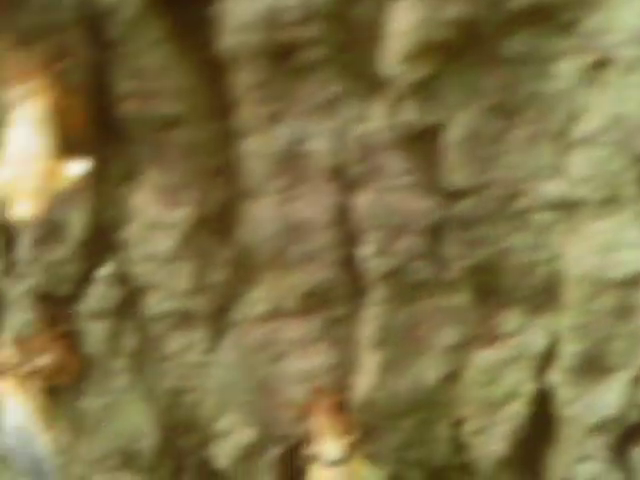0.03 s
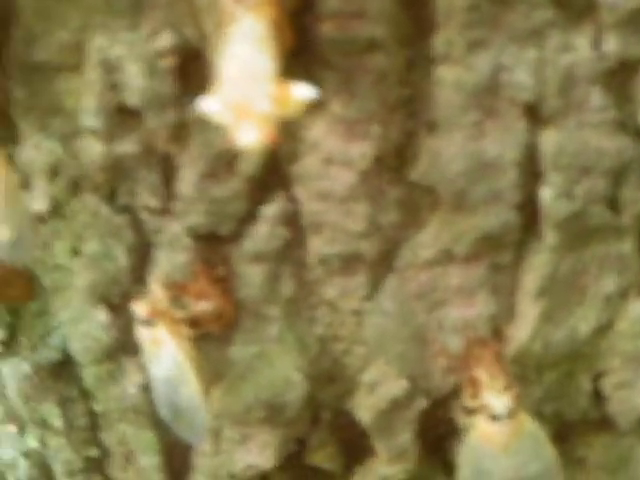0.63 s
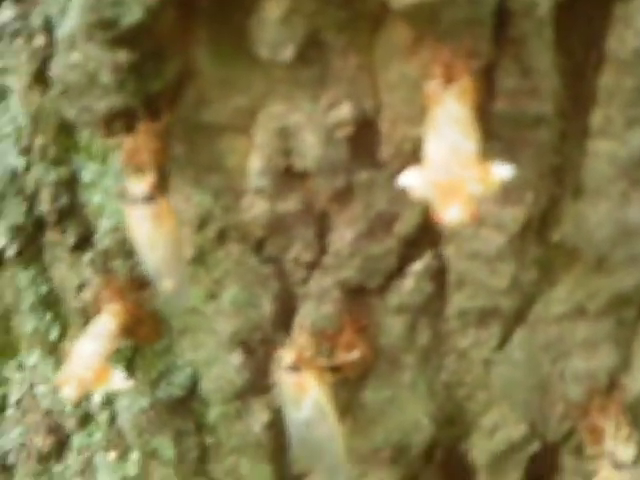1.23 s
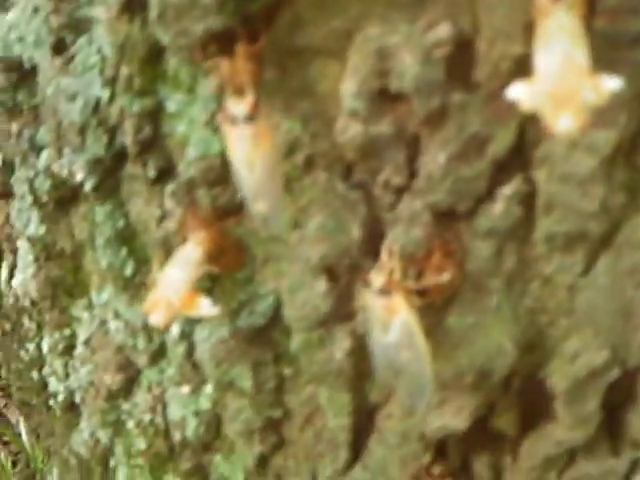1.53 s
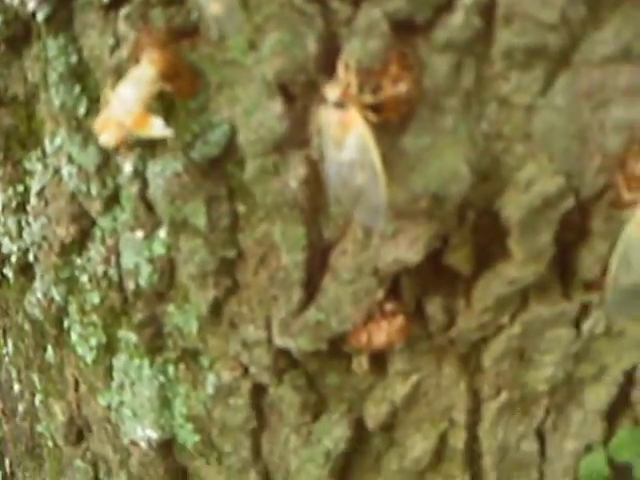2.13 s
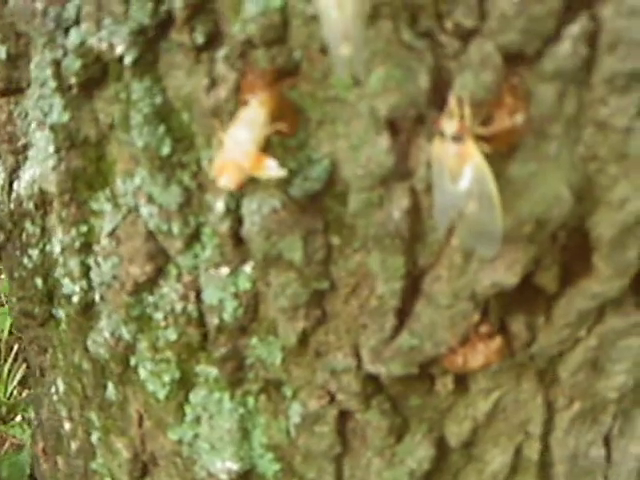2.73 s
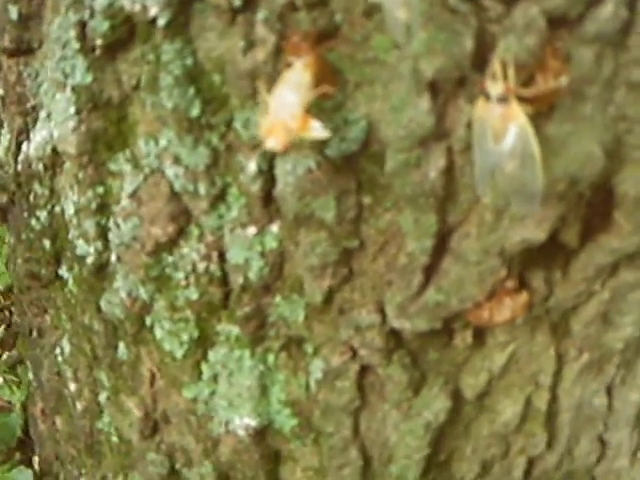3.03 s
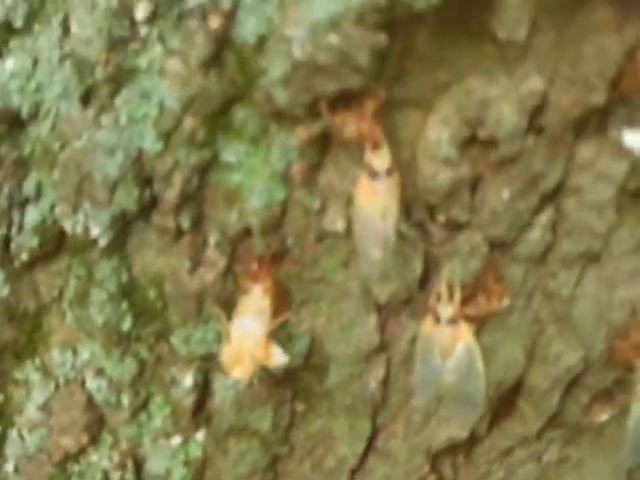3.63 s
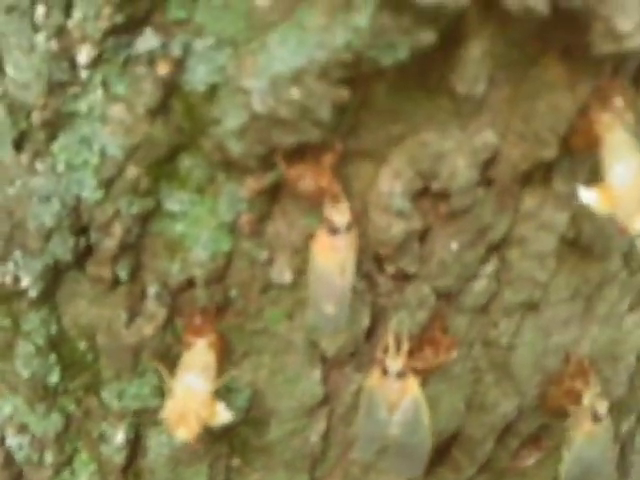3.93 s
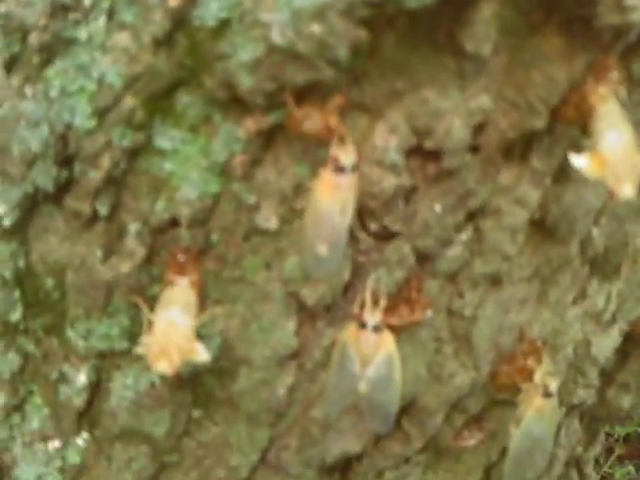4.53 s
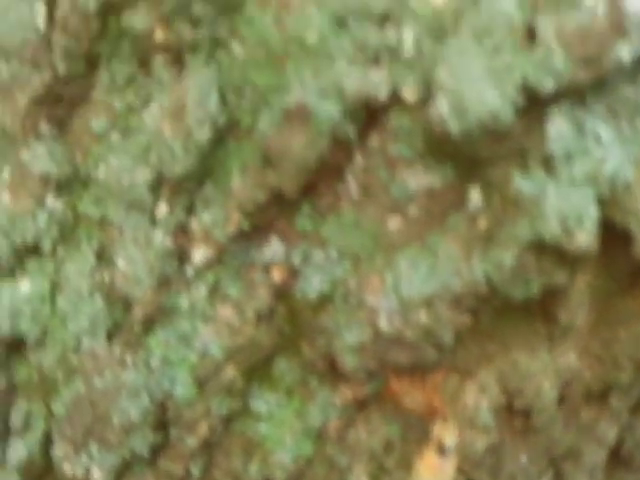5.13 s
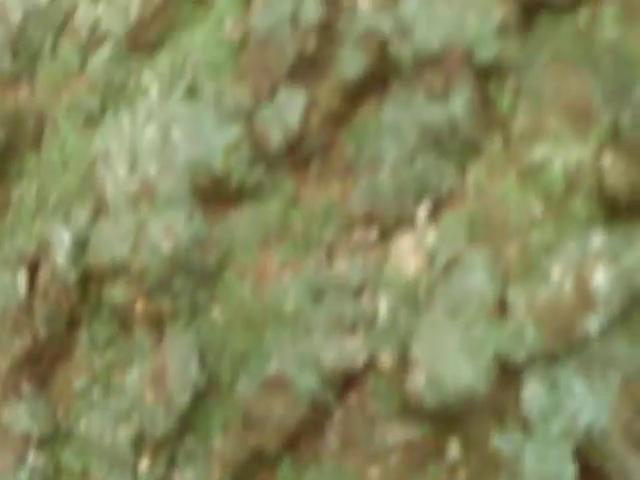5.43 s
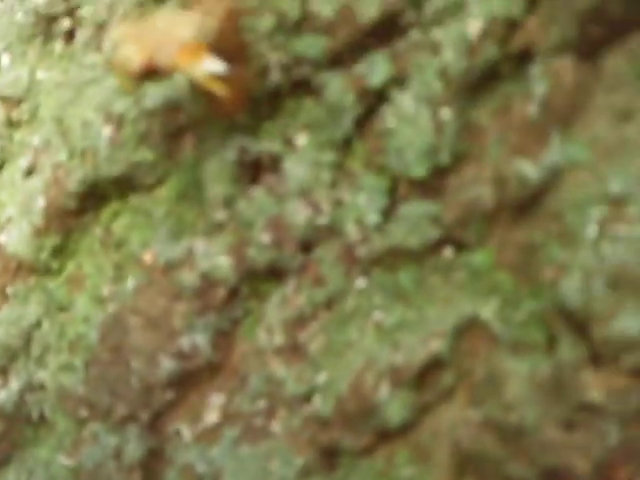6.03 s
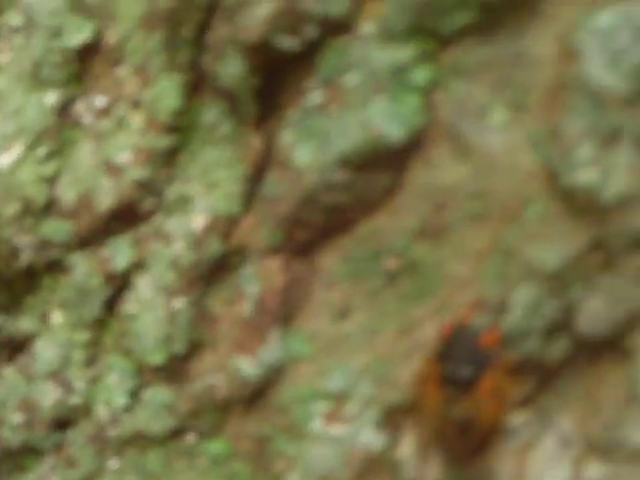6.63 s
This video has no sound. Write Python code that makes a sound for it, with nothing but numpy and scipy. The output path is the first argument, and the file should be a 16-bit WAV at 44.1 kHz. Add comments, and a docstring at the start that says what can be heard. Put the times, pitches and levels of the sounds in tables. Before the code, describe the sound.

Outdoors by a tree, distant birds give short, faint peeps over a steady low rumble and machine hum. A light, close tap on the camera body comes about two seconds in, followed by a couple of much softer ones. Around five seconds there are two sharp clicks on the plastic case, the first the loudest, the second briefly ringing and bouncing. The camera's own microphone catches them without echo.

```python
"""A catch on a hand-held camera snaps twice against the plastic case; its metal part rings and bounces.
Fingers tap the camera's shell, and a small motor inside whines softly. Behind this is a quiet day
outdoors: low rumble, a far machine hum, a few faint bird notes and stirring leaves.
The narrow-band recorder holds its hiss down between the knocks and overloads on the hardest one."""
import sys
import numpy as np
from scipy import signal
from scipy.fft import rfft, irfft
from scipy.io import wavfile
from scipy.ndimage import uniform_filter1d

SR = 44100
rng = np.random.default_rng(int(sys.argv[2]) if len(sys.argv) > 2 else 0)


def put_to_file(sound):
    """Save the sound as 16-bit audio at rate SR, in the file named by the first command-line argument."""
    columns = np.atleast_2d(sound).T  # one column per channel
    safe = np.clip(columns, -1, 1)
    whole_steps = np.round(safe * 32767)
    wavfile.write(sys.argv[1], SR, whole_steps.astype(np.int16))


N = 298998
TIME = np.arange(N) / SR

# the tones at which the plastic case rings: f/Hz, level/dB, t60/s (time to fade by 60 dB)
CASE_TONES = [(676, -13.5, 0.059), (752, -20.5, 0.071), (899, -15.5, .055), (1105, -32, 0.0289),
              (1327, -27, .034), (1470, -22.5, 0.061), (1597, -13, 0.048), (1647, -6, 0.058),
              (1860, -26, 0.015), (1953, -14, 0.027), (2306, -22.5, 0.024), (2610, -21.5, 0.021),
              (3000, -15, 0.016), (3500, -24, .018), (3570, -8.5, 0.02), (4240, -28, 0.011)]
KNOCK_LOW_CUT_HZ, SOFT_KNOCK_HIGH_CUT_HZ = 730, 4200


def from_db(db):
    """Turn decibels into a factor to multiply by."""
    return 10 ** (np.asarray(db) / 20)


def rms_one(x):
    """Scale a signal so that its average strength (rms) is 1."""
    return x / np.sqrt(np.mean(x ** 2) + 1e-20)


def butter(x, hz, kind, order=2):
    """Keep what lies below hz ("low") or above it ("high")."""
    return signal.sosfilt(signal.butter(order, min(hz, .45 * SR), kind, fs=SR, output="sos"), x)


def noise(spectrum):
    """Steady noise shaped by rows of f/Hz, level/dB; rms 1."""
    hz, db = np.transpose(spectrum)
    bin_hz = np.maximum(np.arange(N // 2 + 1) * SR / N, 1)
    gain = from_db(np.interp(np.log(bin_hz), np.log(hz), db))
    return rms_one(irfft(rfft(rng.standard_normal(N)) * gain, N))


def narrow_noise(hz, width_hz):
    """Noise in a narrow band: a wavering tone, or a random wobble if hz is 0; rms 1."""
    bin_hz = np.arange(N // 2 + 1) * SR / N
    return rms_one(irfft(rfft(rng.standard_normal(N)) / (1 + ((bin_hz - hz) / width_hz) ** 2), N))


def rumble_and_hiss(rumble_db=-42.5, hiss_db=-55):
    """The steady low rumble of the outdoors and the microphone's own hiss."""
    # the shape of each noise from bass to treble: f/Hz, relative level/dB
    rumble_shape = [(10, -1.5), (25, -1.5), (50, 0), (85, -2), (110, -4.5), (150, -11.5), (200, -15.5),
                    (300, -19.5), (450, -27.5), (800, -39), (2000, -53.5)]
    hiss_shape = [(100, -1), (500, 2), (900, 2.5), (1500, 0), (1950, 0), (2300, 2), (2700, 0), (3400, 0),
                  (3800, -1.5), (4100, -10), (4400, -21)]
    return from_db(rumble_db) * noise(rumble_shape) + from_db(hiss_db) * noise(hiss_shape)


def far_machinery(steady_share=0.74):
    """A low hum, partly wavering on its way through the air, and a higher drone that swells once."""
    # the tones of the hum: f/Hz, level/dB, width/Hz
    hum_tones = [(30.4, -54, 1.3), (56.3, -48, 3.6), (119.6, -49.5, 3.6), (172.7, -57.5, 11),
                 (236.4, -67.5, 4.2)]
    peak_s, rise_s, fall_s = 3.9, 1.6, .6
    rest_db, peak_db = -71, -60.5
    swell = np.exp(-np.abs(TIME - peak_s) / np.where(TIME < peak_s, rise_s, fall_s))
    out = from_db(rest_db + (peak_db - rest_db) * swell) * narrow_noise(hz=1083, width_hz=46)
    for hz, db, width_hz in hum_tones:
        steady = np.sqrt(2) * np.sin(2 * np.pi * (hz * TIME + rng.random()))
        wavering = narrow_noise(hz, width_hz)
        out += from_db(db) * (np.sqrt(steady_share) * steady + np.sqrt(1 - steady_share) * wavering)
    return out


def motor_whine(wobble=0.00088):
    """A small motor in the camera runs at an almost constant speed."""
    # the tones of the motor: f/Hz, level/dB
    motor_tones = [(617.8, -61), (1235.6, -70)]
    speed = 1 + wobble * narrow_noise(0, width_hz=2.8)
    motor_time = np.cumsum(speed) / SR
    return sum(from_db(db) * np.sqrt(2) * np.sin(2 * np.pi * hz * motor_time) for hz, db in motor_tones)


def whistle(middle_s, length_s, hz, octaves_per_s, db, waver):
    """One bird note: it swells and fades while its pitch glides."""
    from_middle = np.clip(TIME - middle_s, -length_s / 2, length_s / 2)
    pitch_hz = hz * 2 ** (octaves_per_s * from_middle) * waver
    swell = np.cos(np.pi * from_middle / length_s) ** 2
    return from_db(db) * swell * np.sin(2 * np.pi * np.cumsum(pitch_hz) / SR)


def birds(echo_t60=0.17, echo_gain=0.31):
    """Short whistles, unsteady in pitch and smeared by echoes off the trees."""
    # a far bird's call, a level note and then an upward flick: t/s, note level/dB, flick level/dB
    calls = [(0.050, -54, -51), (0.319, -57, -53), (4.232, -50.5, -56.5), (4.757, -59, -56.5)]
    # single sagging notes from farther birds: t/s, f/Hz, level/dB
    peeps = [(1.817, 2160, -58), (2.053, 2175, -57), (2.935, 1970, -58), (3.17, 2100, -60.5),
             (3.42, 2090, -54.5), (3.562, 2580, -56), (4.326, 1600, -56.5)]
    note_hz, flick_hz = 2255, 2634
    note_s, peep_s, flick_delay_s = .054, .075, 0.046
    flick_octaves_per_s, peep_octaves_per_s = 2.7, -1.6
    waver = 1 + 0.014 * narrow_noise(0, width_hz=110)
    direct = sum(whistle(t, peep_s, hz, peep_octaves_per_s, db, waver) for t, hz, db in peeps)
    for t, note_db, flick_db in calls:
        direct += whistle(t, note_s, note_hz, 0, note_db, waver)
        direct += whistle(t + flick_delay_s, note_s, flick_hz, flick_octaves_per_s, flick_db, waver)
    echo_tail = rng.standard_normal(SR) * from_db(-60 * TIME[:SR] / echo_t60)
    echoes = signal.fftconvolve(direct, echo_tail / np.linalg.norm(echo_tail))[:N]
    return np.sqrt(1 - echo_gain ** 2) * direct + echo_gain * echoes


def ring(clicks, hz, t60):
    """Each click starts a fading sine wave as tall as the click."""
    fade = from_db(-60 / (max(t60, .001) * SR))
    angle = 2 * np.pi * hz / SR
    return signal.lfilter([0, np.sin(angle)], [1, -2 * fade * np.cos(angle), fade ** 2], clicks + 1e-18)


def strike(tones, hits, treble_db_per_octave=0, pivot_hz=1500):
    """Each hit sets all of an object's tones ringing; their levels can be tilted around pivot_hz."""
    times, hit_db = np.transpose(hits)
    out = np.zeros(N)
    for hz, tone_db, t60 in tones:
        tilt_db = treble_db_per_octave * np.log2(hz / pivot_hz)
        clicks = np.zeros(N)
        clicks[np.round(times * SR).astype(int)] = from_db(hit_db + tone_db + tilt_db)
        out += ring(clicks, hz, t60)
    return out


def soft_strike(tones, hits, even_db, pivot_hz, brightening=0.36):
    """Soft hits lack the top treble; those above even_db sound brighter, those below it duller."""
    _, hit_db = np.transpose(hits)
    ringing = strike(tones, hits, brightening * (hit_db - even_db), pivot_hz)
    return butter(ringing, SOFT_KNOCK_HIGH_CUT_HZ, "low", order=6)


def finger_taps(thump_hz=95, thump_db=-12, thump_t60=0.08):
    """A fingertip makes the shell ring and rocks the camera with a faint thump."""
    # fingers land on the shell: t/s, level/dB
    taps = [(1.9308, -19), (1.9339, -29), (3.232, -41.5), (3.4978, -33.5), (5.3313, -23.5)]
    # the tones of the shell under a fingertip: f/Hz, level/dB, t60/s
    shell_tones = [(616, -13.5, .028), (746, -10.5, 0.031), (949, -15, 0.027), (1298, -10.5, 0.025),
                   (1518, -11.5, 0.016), (1685, -13.5, 0.014), (2850, -13, 0.0084), (3490, -18.5, 0.024)]
    shell = soft_strike(shell_tones, taps, even_db=-19, pivot_hz=1300)
    thump = strike([(thump_hz, thump_db, thump_t60)], taps)
    return butter(shell, KNOCK_LOW_CUT_HZ, "high", order=6) + thump


def leaves(flutter_db=3.5):
    """Leaves stir faintly, making brief swells of fluttering hiss."""
    # the swells: t/s, half-length/s, level/dB
    rustles = [(2.86, 0.12, -60), (3.55, 0.24, -62), (4.108, 0.09, -60.5), (6.5, 0.054, -60.5)]
    # the shape of the leaves' hiss: f/Hz, relative level/dB
    leaf_shape = [(1200, -29), (2000, -4.5), (2700, 0.5), (3300, 1.5), (4000, -14)]
    swell = sum(from_db(db) * np.exp(-((TIME - t) / half_s) ** 2) for t, half_s, db in rustles)
    flutter = from_db(flutter_db * narrow_noise(0, width_hz=25))
    return swell * flutter * noise(leaf_shape)


def catch_snaps():
    """The sprung catch always hits hard, so the case rings with its full treble."""
    # the catch hits the case: t/s, level/dB
    snaps = [(4.8219, -7.5), (4.8295, -21.5)]
    return butter(strike(CASE_TONES, snaps), KNOCK_LOW_CUT_HZ, "high", order=6)


def metal_bounces(case_shake_db=-16):
    """The catch's loose metal part drops and bounces, ringing and shaking the case."""
    # each landing: t/s, level/dB
    bounces = [(5.3310, -13.5), (5.3392, -22), (5.3468, -28.5), (5.3700, -29.5), (5.402, -33)]
    # the tones of the metal part: f/Hz, level/dB, t60/s
    metal_tones = [(1597, -7, .066), (3520, -3.5, .01)]
    metal = soft_strike(metal_tones, bounces, even_db=-21, pivot_hz=1600)
    case = from_db(case_shake_db) * soft_strike(CASE_TONES, bounces, even_db=-15, pivot_hz=1500)
    return butter(metal + case, KNOCK_LOW_CUT_HZ, "high", order=6)


def scene():
    """Over a quiet background, knocks reach the microphone straight through the camera, with no echo."""
    background = rumble_and_hiss() + far_machinery() + leaves() + birds() + motor_whine()
    knocks = finger_taps() + catch_snaps() + metal_bounces()
    return (background + knocks)[None]


def expander(x, threshold_db, range_db, hold_s, release_db_per_s):
    """A sound above the threshold turns everything up; the volume holds, then sinks back."""
    power = uniform_filter1d(butter(x, 520, "high") ** 2, size=44)
    level_db = 10 * np.log10(np.abs(power) + 1e-12)
    boost_db = np.clip(level_db - threshold_db, 0, range_db)
    overshoot = 1 + hold_s * release_db_per_s / range_db  # keeps a full boost at its limit for hold_s
    fall_db = release_db_per_s * TIME
    held_db = np.maximum.accumulate(boost_db * overshoot + fall_db, axis=-1) - fall_db
    return x * from_db(np.minimum(held_db, range_db))


def record(dry, voice_band_hz=4344, overload=.71, top_hz=15800):
    """The recorder lifts loud moments, keeps a narrow band, clips peaks and cuts the highest treble."""
    expanded = expander(dry, threshold_db=-31.5, range_db=5.5, hold_s=0.046, release_db_per_s=30)
    voice_filter = signal.firwin(301, voice_band_hz, window="blackman", fs=SR)
    narrow = signal.fftconvolve(expanded, voice_filter[None], "same")
    clipped = np.clip(narrow, -overload, overload)
    return signal.sosfilt(signal.cheby2(12, 70, top_hz, fs=SR, output="sos"), clipped)


dry = scene()
out = record(dry)
put_to_file(out)
```